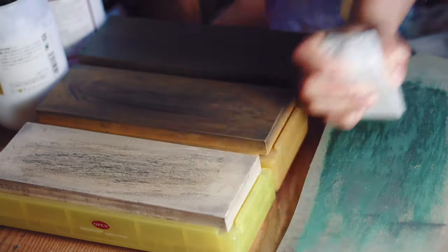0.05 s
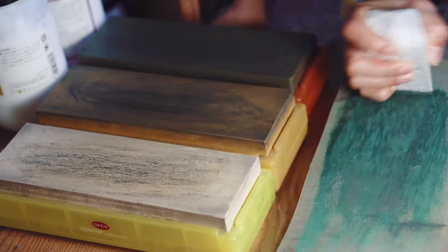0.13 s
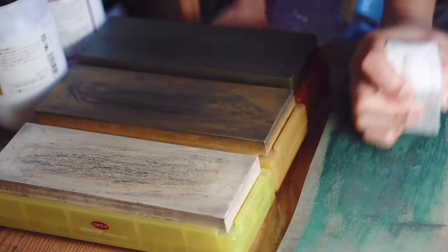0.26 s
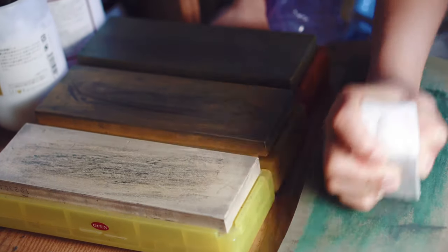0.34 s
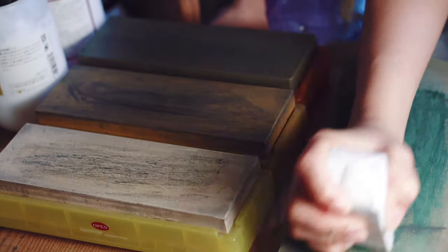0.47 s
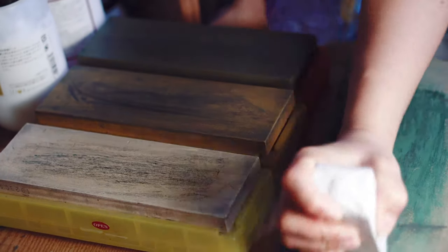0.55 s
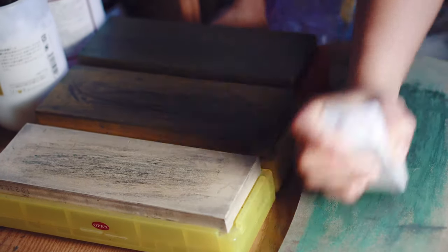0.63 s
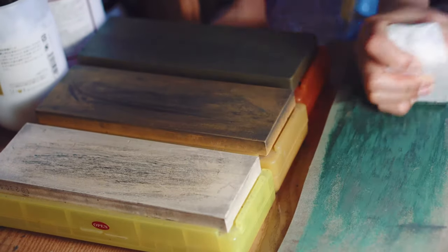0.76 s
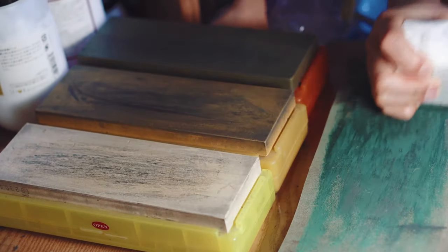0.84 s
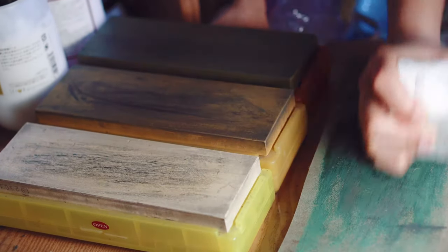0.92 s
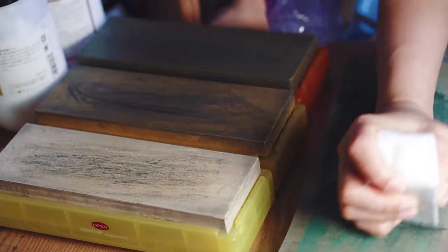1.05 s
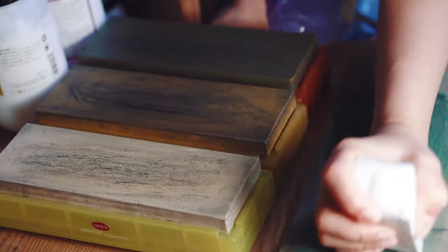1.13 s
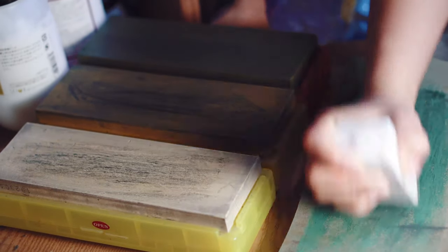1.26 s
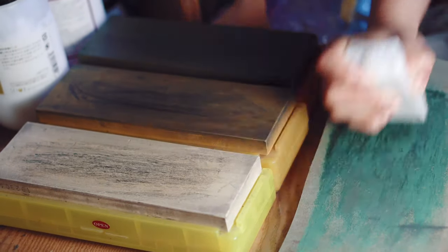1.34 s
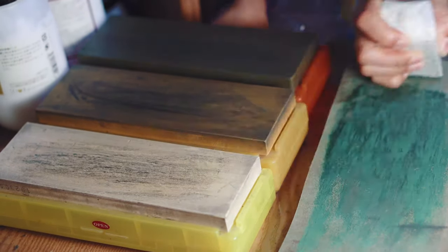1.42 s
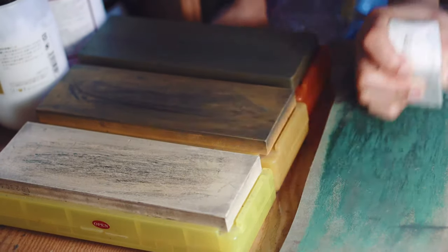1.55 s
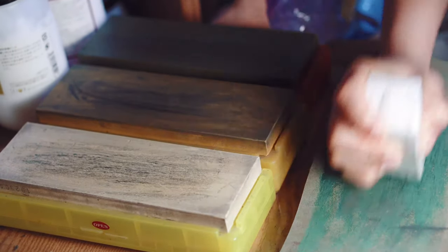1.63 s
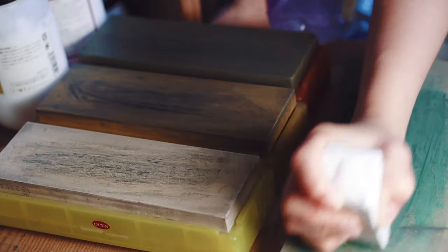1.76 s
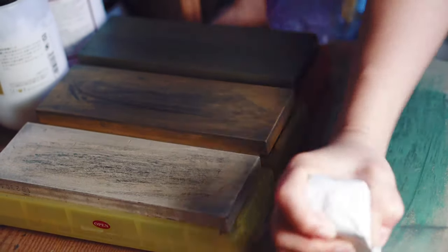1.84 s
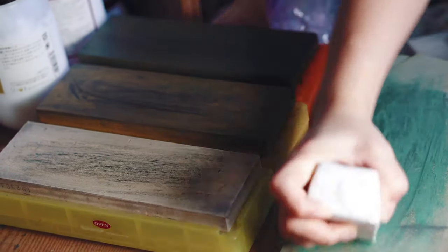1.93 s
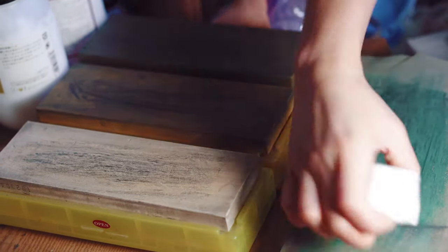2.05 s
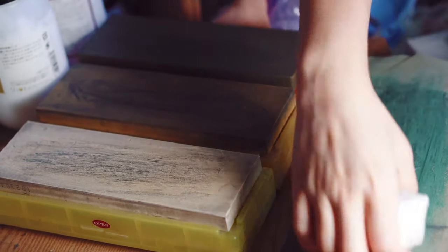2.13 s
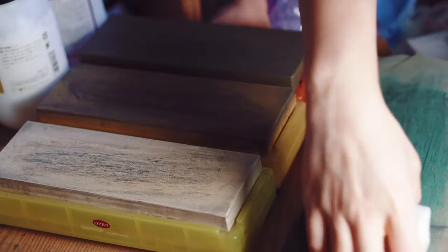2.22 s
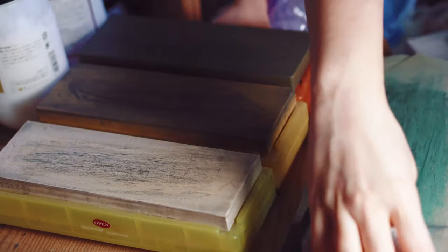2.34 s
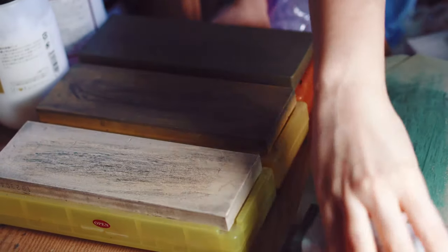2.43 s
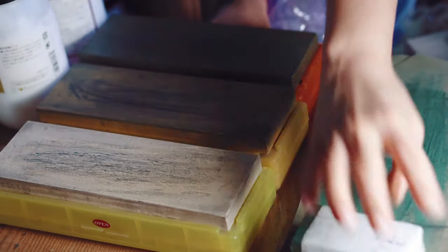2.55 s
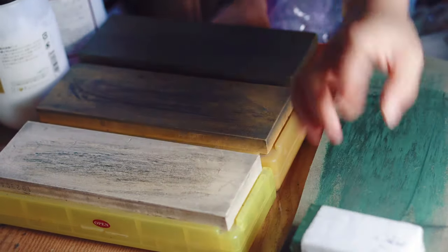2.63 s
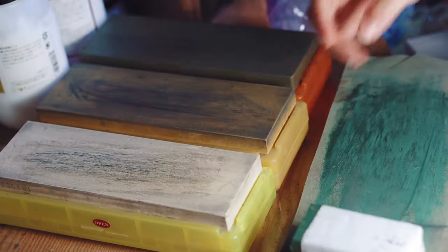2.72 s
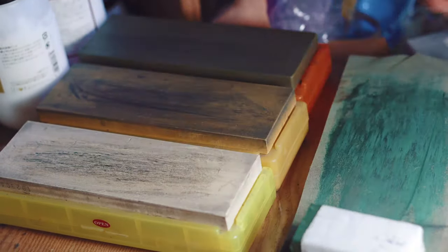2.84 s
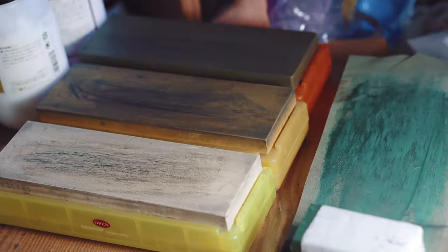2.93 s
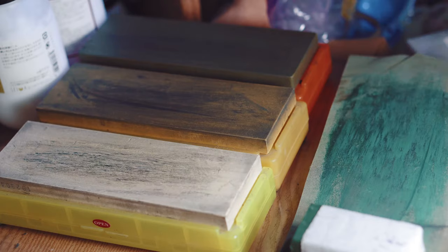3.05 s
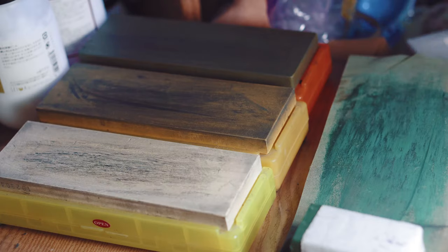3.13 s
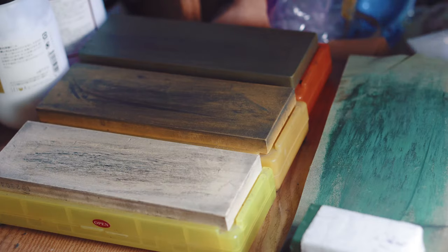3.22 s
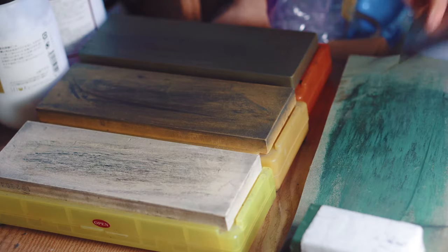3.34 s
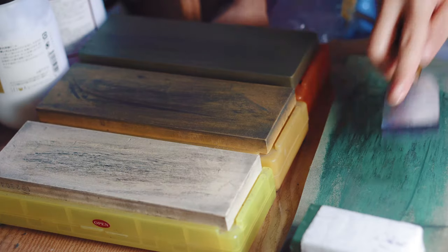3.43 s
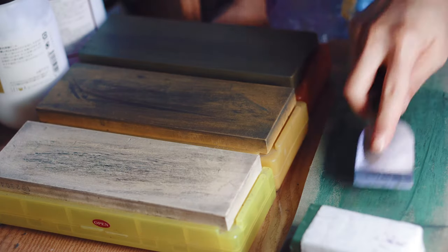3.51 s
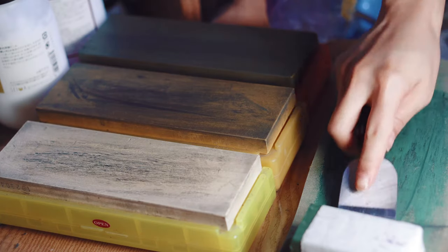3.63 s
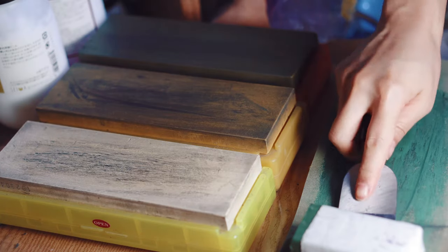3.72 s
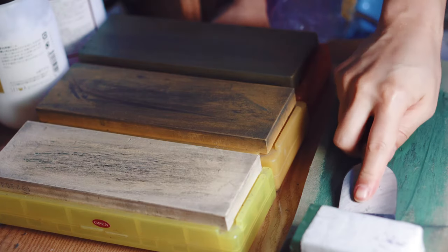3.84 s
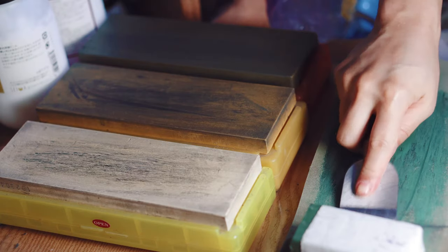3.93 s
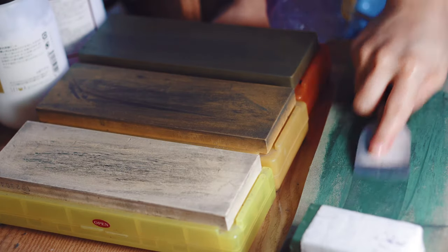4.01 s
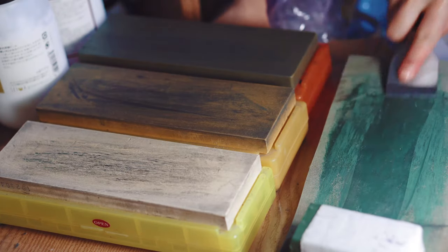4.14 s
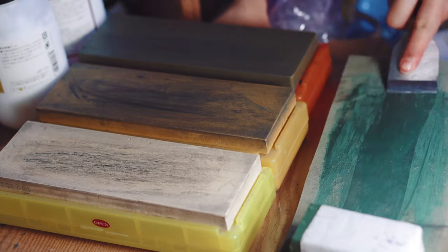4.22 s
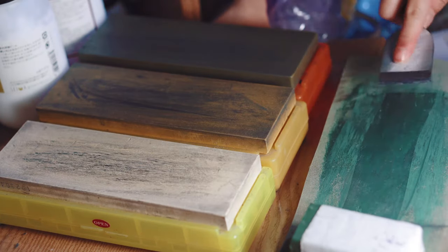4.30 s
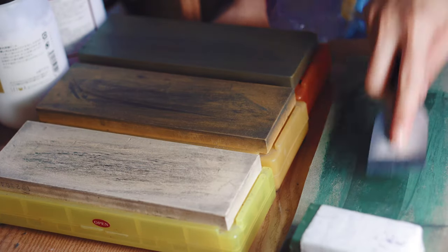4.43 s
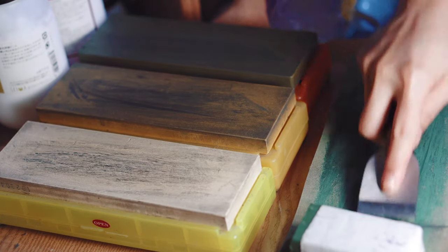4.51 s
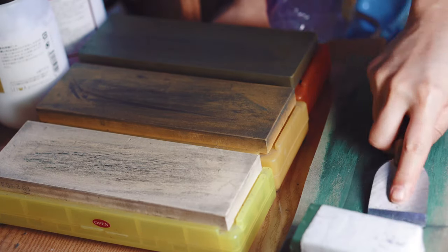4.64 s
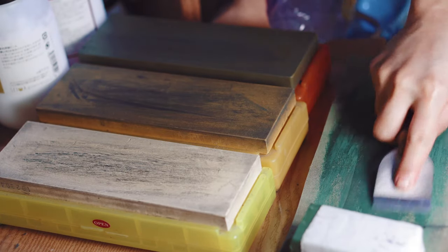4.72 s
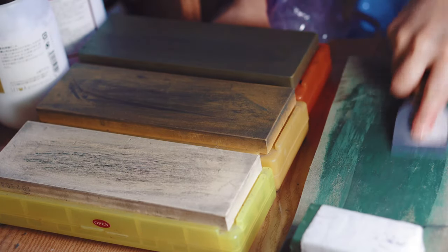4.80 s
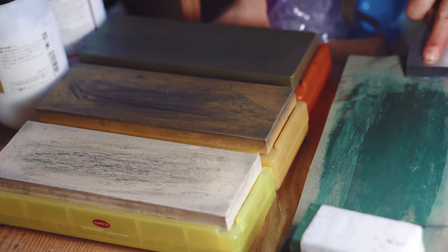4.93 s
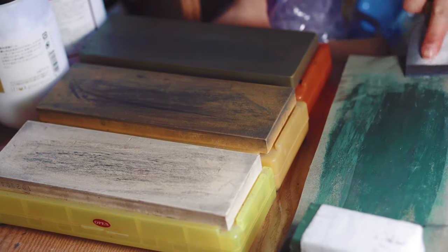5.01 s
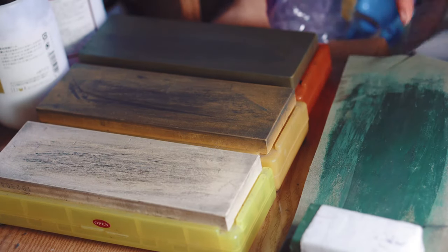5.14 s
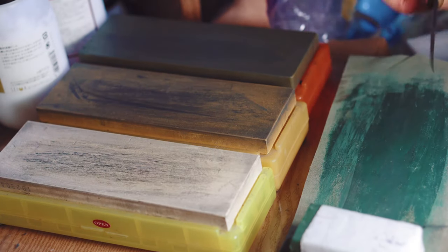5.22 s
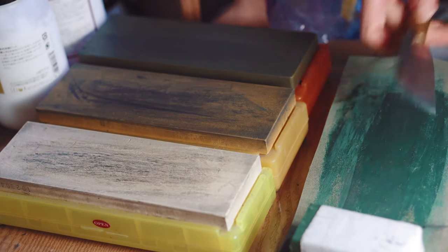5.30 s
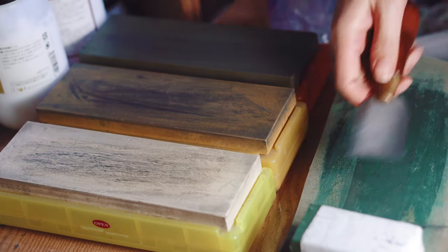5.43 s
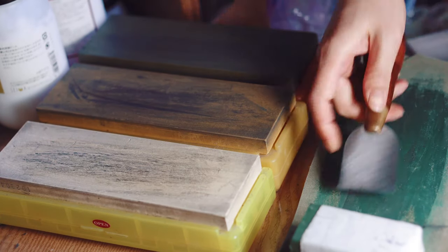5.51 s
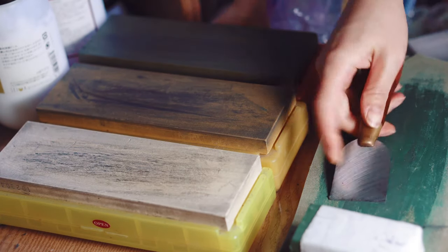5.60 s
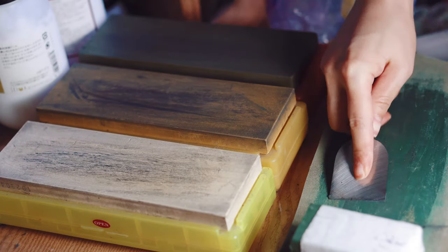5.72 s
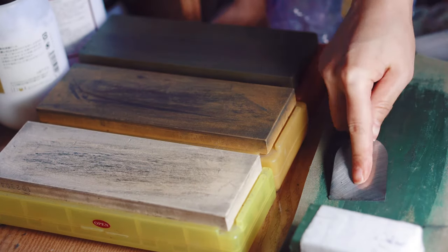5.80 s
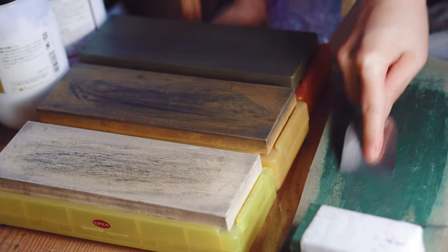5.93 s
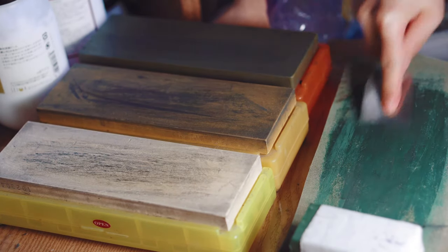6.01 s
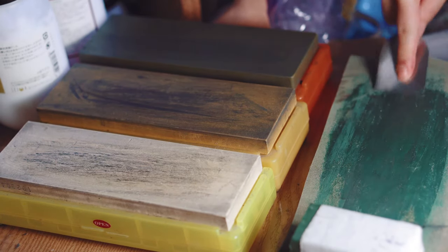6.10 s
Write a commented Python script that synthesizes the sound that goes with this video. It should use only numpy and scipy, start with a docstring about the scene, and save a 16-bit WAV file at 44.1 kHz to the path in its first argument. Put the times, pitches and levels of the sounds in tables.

```python
"""A block of polishing compound is scrubbed three times over a leather strop on a wooden table, then put down.
A flat steel blade is then drawn across the leather in three light swishes.
Friction is modelled as random slips exciting coloured spectra, and contacts as decaying bursts and modes.
The table rocks and thuds by damped modes and bending waves; a fan hums in the small room."""
import sys
import numpy as np
from scipy import signal
from scipy.fft import rfft, irfft
from scipy.io import wavfile
from scipy.ndimage import uniform_filter1d

SR = 44100
rng = np.random.default_rng(int(sys.argv[2]) if len(sys.argv) > 2 else 0)


def store_wav(level_fs):
    """Save 16-bit WAV to argv[1]."""
    pcm = np.round(np.clip(np.atleast_2d(level_fs), -1, 1) * 32767)
    wavfile.write(sys.argv[1], SR, pcm.T.astype(np.int16))


N = 271656
TIME, BINS = np.arange(N) / SR, np.fft.rfftfreq(N, 1 / SR)  # seconds, Hz

# fan: noise spectrum of the air [pitch_hz, level_db], relative
AIR_SPECTRUM = [(90, -11.5), (127, 0.5), (190, -13), (250, -12), (330, -16), (560, -20.5), (980, -21),
                (1350, -27.5), (2700, -38.5), (4650, -44), (9000, -46.5), (16000, -56.5)]
# resonant bumps in the air noise [pitch_hz, width_hz, lift_db]
AIR_MODES = [(511, 30, 6.5), (1703, 320, 4.5), (4460, 1220, 12)]
# motor tones [pitch_hz, level_db, waver_hz], waver as rms
MOTOR_TONES = [(65.5, -38, 2.26), (118.5, -46.5, 4.444), (551, -61.5, 3.03), (2640, -72.5, 0.094)]
AIR_DB = -42.5

# table top: nominal modes, level relative to the blow [pitch_hz, level_db, t60_s]
TABLE_MODES = [(47.45, -3, 1), (76.1, 1, 0.36), (104.6, -6.5, 0.48), (170, -14, 0.26), (397, -1, 0.036),
               (535, 1, 0.055)]
# low rumble of the shaken table [pitch_hz, level_db], relative
RUMBLE_SPECTRUM = [(15, 4), (33, -9), (50, -1.5), (62, -20), (82, -10.5), (120, -39), (250, -38.5),
                   (500, -53)]
# spells in which the arm leans on the table and shakes it [start_s, end_s, level_db]
LEANING_SPELLS = [(0, 2.58, -21.5), (4.1, 5.64, -36.5)]
# the table rocks on its legs where the arm turns back [middle_s, peak_db, pitch_hz]
TABLE_LURCHES = [(0.533, -6.5, 47), (1.012, -6, 41.3), (1.133, -4.5, 43.4), (1.836, -7.5, 47.4),
                 (1.885, -8.5, 48.6), (5.124, -16.5, 21.6)]
# block or blade lands on the leather; soft pushes are centred low, hard landings high
# [start_s, thud_db, thud_centre_hz, slap_db]
LANDINGS = [(0.236, -26, 120, -44), (0.283, -22, 72, -43), (0.494, -15.5, 61, -56),
            (.867, -14, 67.6, -28.5), (0.959, -15, 71.4, -36), (1.531, -17, 70, -30), (2.009, -26, 53, -49),
            (2.318, -13.5, 97, -34.5), (2.471, -20, 57.7, -35.5), (3.802, -24.5, 172, -41),
            (4.701, -20, 196, -33), (5.698, -19, 150, -32.5)]
SLAP_HZ, SLAP_T60_S = 890, 0.032
# the bending wave of a blow falls in pitch towards the table's main mode
BEND_END_HZ, BEND_SPAN_HZ, BEND_FALL_S, BEND_RISE_S, BEND_T60_S = 72.5, 427, 0.01063, 0.012, 0.23
SHAKE_RISE_DB_PER_S, SHAKE_FALL_DB_PER_S, SHAKE_REST_DB = 11, 59, -41.5
# extra sway as each scrub's fast push eases and after each stroke's top speed
SWAY_S, SCRUB_SWAY_DB, STROKE_SWAY_DB = 0.78, -22, -28.5
SWAY_LAG_S = 0.3  # a stroke's sway is centred this long after the blade's top speed

# fingers brushing block, blade and leather [middle_s, level_db, length_s]
FINGER_SCUFFS = [(.05, -59, 0.13), (.248, -48, 0.025), (.879, -46.5, 0.032), (1.546, -47, 0.028),
                 (2.02, -48.5, 0.13), (2.098, -47, 0.052), (2.272, -53, 0.052), (2.385, -52.5, 0.13),
                 (2.487, -45, 0.079), (3.15, -57, 0.052), (3.344, -54.5, 0.03), (4.456, -51.5, 0.02),
                 (5.078, -48.5, 0.045), (5.18, -52, 0.055)]
# rustle of skin [pitch_hz, level_db], relative
SKIN_SPECTRUM = [(500, 16.5), (1500, -5.5), (4200, -2), (5600, -6), (8700, -4.5), (12000, -13),
                 (16000, -19)]

# small contacts of block, nail and steel [start_s, starting_db, centre_hz, t60_s]
SMALL_CONTACTS = [(0.333, -31, 1240, 0.041), (0.477, -27.5, 2720, 0.05), (0.503, -34, 2600, 0.032),
                  (0.914, -34, 550, 0.068), (0.9593, -32.5, 1390, 0.13), (1.614, -33, 1630, 0.12),
                  (2.0084, -35, 5730, 0.024), (2.035, -42, 7000, .008), (2.08, -48, 6500, 0.021),
                  (2.164, -36.5, 11100, 0.016), (2.33, -41.5, 12000, 0.023), (2.457, -30.5, 8300, 0.027),
                  (2.461, -32.5, 2840, 0.032), (5.069, -39, 2000, 0.12), (5.084, -29, 1280, 0.045),
                  (5.274, -47.5, 4800, 0.043), (5.7, -50, 6440, 0.031)]
# body common to all small contacts [pitch_hz, level_db], relative
CONTACT_SPECTRUM = [(200, 27), (700, 24), (1700, 15), (2100, 12), (2700, 10), (4200, 8), (5600, 1.5),
                    (8700, 6.5), (12000, 6.5), (16000, -2)]
# the blade clinks as it is turned over and set down [start_s, level_db]
BLADE_CLINKS = [(5.243, -51), (5.274, -42.5), (5.697, -46.5)]
# ringing of the clinked blade, level relative to the hit [pitch_hz, level_db, t60_s]
CLINK_RINGING = [(3360, -4.5, 0.05), (4630, -3, 0.031), (6228, -11, 0.056), (7540, -2, 0.023),
                 (8500, -15, .03), (9100, -9, 0.055), (12500, -18, .03)]
# the block tips onto its side [start_s, level_db]
BLOCK_TAPS = [(2.408, -25)]
# ringing of the block, level relative to the hit [pitch_hz, level_db, t60_s]
BLOCK_RINGING = [(730, 1.5, 0.037), (880, -7, 0.03), (1160, -11.5, 0.032), (1583, -7.5, 0.025)]
# fingernails click on the block as the grip shifts and lets go [start_s, level_db]
NAIL_CLICKS = [(1.358, -49), (1.974, -43), (2.535, -38), (2.695, -37.5)]
# colour of a nail click [pitch_hz, level_db], relative
NAIL_SPECTRUM = [(1400, -2.5), (2100, -6), (2600, 5), (3400, -6), (4800, -20), (11000, -22.5)]
NAIL_T60_S = 0.022

# the blade gathers speed along the leather, then slows and lifts
# [edge_bites_s, top_speed_s, speeding_up_s, slowing_s, friction_db, edge_hiss_db]
BLADE_STROKES = [(4.01, 4.181, 0.094, 0.075, -30.5, -49.5), (4.78, 4.98, 0.083, 0.043, -25.5, -44.5),
                 (5.975, 6.02, 0.061, 0.14, -40.5, -50.5)]
# friction of the flat steel face [pitch_hz, level_db], relative
FACE_SPECTRUM = [(110, 15.5), (200, -0.5), (330, -3.5), (560, -1.5), (950, -8), (1500, -5.5), (2100, -9.5),
                 (2900, -8.5), (4300, -9), (5300, -27), (8000, -50)]
# resonances stirred in the blade [pitch_hz, width_hz, lift_db]
FACE_MODES = [(460, 336, 14.5), (1290, 170, 8), (1650, 310, 5.5)]
# hiss of the blade's edge [pitch_hz, level_db], relative
EDGE_SPECTRUM = [(5000, 2.5), (6100, 5.5), (8900, 8), (11000, 1), (13500, -4), (16000, -6)]
# at top speed in the hardest stroke the edge rasps on one resonance [middle_s, level_db, length_s]
EDGE_RASPS = [(4.992, -36.5, 0.043)]
# resonance of that rasp [pitch_hz, level_db], relative
RASP_SPECTRUM = [(3700, -9), (4060, 2), (4450, -8)]
# the blade creeps into place before its last stroke [middle_s, level_db, length_s]
BLADE_CREEPS = [(5.84, -35, 0.025), (5.894, -33, .02), (5.87, -37, 0.19)]
# low judder of the creeping blade [pitch_hz, level_db], relative
CREEP_SPECTRUM = [(90, -1.5), (190, -3.5), (300, -17), (480, -4.5), (800, -33)]
# fingertips slide on the steel and make it ring faintly [middle_s, level_db, length_s]
STEEL_WISPS = [(5.3, -66, .1), (5.41, -65, 0.07), (5.595, -67, 0.054), (5.79, -67.5, 0.24),
               (5.93, -63, 0.079)]
# colour of the fingertip slides [pitch_hz, level_db], relative
WISP_SPECTRUM = [(5500, -1), (8800, 0), (10500, -15), (14000, -11)]
# faint ringing of the touched steel [pitch_hz, width_hz, lift_db]
WISP_RINGING = [(8750, 300, 4), (9300, 260, 8), (12250, 300, 12)]
FACE_POWER, EDGE_POWER = 0.74, 0.49  # friction and hiss grow as these powers of the speed
BITE_S, LIFT_POWER = 0.018, 2.7  # time for the bevel to settle flat; steepness of the slowing
BODY_HZ, BODY_LIMIT_DB = 870, -33.5  # the low body levels off in a hard stroke, so it sounds brighter

# the block is pushed along the leather, fast at first and then easing
# [start_s, length_s, fast_part_s, friction_db, grit_hiss_db]
BLOCK_SCRUBS = [(0.282, 0.34, 0.22, -42.5, -48), (0.92, 0.33, 0.19, -44.2, -48),
                (1.569, 0.36, 0.29, -43.5, -48)]
# drag of wax on leather [pitch_hz, level_db], relative
WAX_SPECTRUM = [(400, 14.5), (900, 0), (2130, -1), (2700, 1), (4300, 2), (5800, -6.5), (7000, -6),
                (9100, -19)]
# resonances of the drag [pitch_hz, width_hz, lift_db]
WAX_RESONANCES = [(1260, 140, 7.5), (1690, 150, 8.5)]
# hiss of the grit [pitch_hz, level_db], relative
GRIT_SPECTRUM = [(5500, -20), (7200, -2), (9000, 0.5), (10300, -3.5), (11600, -3.5), (16000, -14)]
# wax crumbs crushed as the block is drawn back or set aside [middle_s, level_db, length_s]
WAX_CRUMBS = [(.13, -50.5, 0.24), (.76, -52.5, 0.15), (1.39, -52, 0.17), (2.01, -54, 0.14)]
# crunch of the crumbs [pitch_hz, level_db], relative
CRUNCH_SPECTRUM = [(700, 3), (1700, 11), (2700, 6), (4500, 0), (8000, -14)]
SCRUB_RISE_S, SCRUB_STOP_DB_PER_S = 0.046, 210
EASE_S, EASE_DRAG_DB, EASE_GRIT_DB = 0.018, -1.5, -7.5  # as the push slows, hiss drops more than drag
# the block's leading edge scrapes on one resonance, which rises and falls with the speed of the push
SCRAPE_HZ, SCRAPE_SWING_HZ, SCRAPE_WIDTH_HZ = 3580, 870, 1300
SCRAPE_DB, SCRAPE_FADE_DB_PER_S = -50.5, 31

CUT_HZ = 15900


def amp(db):
    """Level law: twenty decibels are a factor of ten in amplitude."""
    return 10 ** (np.asarray(db) / 20)


def unit(x):
    """Normalisation by mean power: scales to rms 1."""
    return x / np.sqrt(np.mean(x ** 2) + 1e-20)


def shape_db(points, hz):
    """Spectral envelope on a log-frequency axis, with skirts of 30 dB per octave beyond its ends."""
    point_hz, db = np.transpose(points)
    octave, known = np.log2(hz + 1), np.log2(point_hz + 1)
    beyond = abs(octave - np.clip(octave, known[0], known[-1]))
    return np.interp(octave, known, db) - 30 * beyond


def colour(x, points, modes=()):
    """Linear filtering: multiplies the spectrum of x by an envelope with resonant bumps; rms 1."""
    db = shape_db(points, BINS)
    for hz, width_hz, lift_db in modes:
        db = db + lift_db / (1 + (2 * (BINS - hz) / width_hz) ** 2)
    return unit(irfft(rfft(x) * amp(db), N))


def wander(rate_hz):
    """Slow random fluctuation: noise low-passed near rate_hz, rms 1."""
    noise = rng.standard_normal(N)
    return unit(irfft(rfft(noise) / (1 + (BINS / rate_hz) ** 4), N))


def slips(per_s):
    """Stick-slip excitation: sparse random impulses of uneven size, rms 1."""
    sizes = rng.standard_normal(N)
    return unit(sizes * (rng.random(N) < per_s / SR))


def uneven(x, patch_db):
    """Surface inhomogeneity: the colour of the rubbing shifts in small time-frequency patches."""
    z = signal.stft(x, nperseg=512, noverlap=384)[2]
    patches = uniform_filter1d(rng.standard_normal(z.shape), size=3, axis=0)
    patches = uniform_filter1d(patches, size=12, axis=1)
    varied = z * amp(patch_db * unit(patches))
    return unit(signal.istft(varied, nperseg=512, noverlap=384)[1][:N])


def resonate(x, hz, width_hz):
    """Moving resonance: a double pole in a frame turning at hz; rms 1."""
    turn = np.exp(2j * np.pi * np.cumsum(hz) / SR)
    radius = np.exp(-np.pi * width_hz / SR)
    filtered = signal.lfilter([1], np.poly([radius, radius]), x / turn)
    return unit((turn * filtered).real)


def brushes(rows):
    """Contact envelope: the gain of soft-edged touches [middle_s, level_db, length_s]."""
    return sum(amp(db) * np.exp(-(2 * (TIME - s) / length) ** 4) for s, db, length in rows)


def add(mix, s, sound):
    """Superposition: adds a sound to the mix from s seconds on."""
    part = mix[max(round(s * SR), 0):][:len(sound)]
    part += sound[:len(part)]


def fan():
    """Broadband flow noise with frequency-modulated motor tones."""
    out = amp(AIR_DB) * colour(rng.standard_normal(N), AIR_SPECTRUM, AIR_MODES)
    for hz, db, waver_hz in MOTOR_TONES:
        tone_hz = hz + waver_hz * wander(rate_hz=7.1)
        out = out + amp(db) * unit(np.sin(2 * np.pi * np.cumsum(tone_hz) / SR))
    return out


def room(x, wet_db=-15, t60_s=0.28):
    """Reverberation: sparse reflections from the near walls decay exponentially as a short, faint tail."""
    t = np.arange(SR // 3) / SR
    reflections = rng.standard_normal(len(t)) * (rng.random(len(t)) < .06)
    tail = reflections * (t > .004) * amp(-60 * t / t60_s)
    return x + amp(wet_db) * signal.fftconvolve(x, tail / np.linalg.norm(tail))[:N]


def shaking():
    """Power summation: leaning shakes the table, with sway as scrubs ease and after strokes' top speed."""
    leaning = 0
    for start, end, db in LEANING_SPELLS:
        rise_db = SHAKE_RISE_DB_PER_S * np.maximum(start - TIME, 0)
        fall_db = SHAKE_FALL_DB_PER_S * np.maximum(TIME - end, 0)
        leaning = leaning + amp(db - rise_db - fall_db)
    scrubs = brushes([(s + fast_s, SCRUB_SWAY_DB, SWAY_S) for s, _, fast_s, *_ in BLOCK_SCRUBS])
    strokes = brushes([(top_s + SWAY_LAG_S, STROKE_SWAY_DB, SWAY_S) for _, top_s, *_ in BLADE_STROKES])
    return np.sqrt(amp(SHAKE_REST_DB) ** 2 + leaning ** 2 + scrubs ** 2 + strokes ** 2)


def knock(db, centre_hz, swell_cycles=1.0, octaves=1.89):
    """Dispersion: a bending wave crosses the table top, high notes first; the modes swell behind it."""
    t = np.arange(SR // 3) / SR

    def drive(hz):
        """Spectrum of the blow: strongest at centre_hz."""
        return amp(db) / (1 + (np.log2(hz / centre_hz) / octaves) ** 4) ** 2

    wave_hz = BEND_END_HZ + BEND_SPAN_HZ / (1 + t / BEND_FALL_S) ** 2
    wave = (1 - np.exp(-t / BEND_RISE_S)) * amp(-60 * t / BEND_T60_S)
    out = drive(wave_hz) * wave / wave.max() * np.sin(2 * np.pi * np.cumsum(wave_hz) / SR)
    for hz, mode_db, t60 in TABLE_MODES:
        swell = (1 - np.exp(-(t * hz / swell_cycles) ** 3)) * amp(-60 * t / t60)
        mode_hz = hz * rng.uniform(0.98, 1.065)  # each blow detunes the mode slightly
        out = out + drive(hz) * amp(mode_db) * swell / swell.max() * np.sin(2 * np.pi * mode_hz * t)
    return out


def table():
    """Forced vibration under the arm, with a few cycles of rocking at the turns and a thud at each blow."""
    out = colour(rng.standard_normal(N), RUMBLE_SPECTRUM) * shaking()
    for s, db, hz in TABLE_LURCHES:  # each one swells and dies within about three cycles
        cycles = (TIME - s) * hz
        out += amp(db) * np.exp(-(cycles / 1.58) ** 2) * np.cos(2 * np.pi * cycles)
    for s, db, centre_hz, _ in LANDINGS:
        add(out, s, knock(db, centre_hz))
    return out


def fingers():
    """Sliding friction of skin: clumpy random slips rustle in short brushes."""
    rustle = colour(slips(per_s=6000), SKIN_SPECTRUM)
    return brushes(FINGER_SCUFFS) * unit(rustle * amp(1.9 * wander(rate_hz=30)))


def ticks(octaves=2.1, slope_db=17, crack_s=0.000076, crack_db=3):
    """Impact excitation: a quick crack and a short crumble, dull or bright by its own centre pitch."""
    out, t = np.zeros(N), np.arange(SR // 5) / SR
    hz = abs(np.fft.fftfreq(len(t), 1 / SR))
    slaps = [(s, slap_db, SLAP_HZ, SLAP_T60_S) for s, _, _, slap_db in LANDINGS]
    for s, db, centre_hz, t60 in SMALL_CONTACTS + slaps:
        envelope = amp(-60 * t / t60) + amp(crack_db) * np.exp(-t / crack_s)
        burst = rng.choice([-1, 1], len(t)) * envelope
        # rounded top, straight slopes
        skirt_db = -slope_db * np.hypot(np.log2((hz + 1) / centre_hz), octaves)
        gain = unit(amp(shape_db(CONTACT_SPECTRUM, hz) + skirt_db))
        # minimum phase: rings only after the contact
        causal = np.exp(np.conj(signal.hilbert(np.log(gain + 1e-4))))
        add(out, s, amp(db) * np.fft.ifft(np.fft.fft(burst) * causal).real)
    return out


def ring(hits, modes, vary_db=5.0):
    """Damped modes: a small object held by fingers rings briefly; each hit favours other modes."""
    out, t = np.zeros(N), np.arange(SR // 5) / SR
    for s, db in hits:
        for hz, mode_db, t60 in modes:
            hit_db = db + mode_db + vary_db * rng.standard_normal()
            add(out, s, amp(hit_db - 60 * t / t60) * np.sin(2 * np.pi * hz * t))
    return out


def nails():
    """Heavily damped impact: each nail click is a dry snap that dies within a few milliseconds."""
    gain = sum((TIME > s) * amp(db - 60 * abs(TIME - s) / NAIL_T60_S) for s, db in NAIL_CLICKS)
    return colour(rng.standard_normal(N), NAIL_SPECTRUM) * gain


def blade():
    """Speed-dependent friction: slipping leather fibres stir the steel's resonances while the edge hisses."""
    face_gain = edge_gain = 0
    for bite, top_s, rise_s, fall_s, face_db, edge_db in BLADE_STROKES:
        age = TIME - top_s
        speed = np.exp(-np.where(age < 0, (age / rise_s) ** 2, abs(age / fall_s) ** LIFT_POWER))
        contact = .5 + .5 * np.tanh(2 * (TIME - bite) / BITE_S)
        face_gain = face_gain + amp(face_db) * contact * speed ** FACE_POWER
        edge_gain = edge_gain + amp(edge_db) * contact * speed ** EDGE_POWER
    face = uneven(colour(slips(per_s=4500), FACE_SPECTRUM, FACE_MODES), patch_db=1.4)
    body = signal.sosfiltfilt(signal.butter(2, BODY_HZ, fs=SR, output="sos"), face)
    limited_body = body / np.hypot(1, face_gain / amp(BODY_LIMIT_DB))
    face = face_gain * (face - body + limited_body)
    edge = uneven(colour(slips(per_s=20000), EDGE_SPECTRUM), patch_db=1.4) * edge_gain
    rasp = colour(slips(per_s=11000), RASP_SPECTRUM) * brushes(EDGE_RASPS)
    creep = colour(slips(per_s=2700), CREEP_SPECTRUM) * brushes(BLADE_CREEPS)
    wisps = colour(slips(per_s=16000), WISP_SPECTRUM, WISP_RINGING)
    wisps = wisps * unit(amp(4.2 * wander(rate_hz=70))) * brushes(STEEL_WISPS)
    grip = amp(1.1 * wander(rate_hz=110))
    return grip * (face + edge + rasp) + creep + wisps


def compound():
    """Dry friction: wax drags on the nap, its grit hisses most on the fast push, and loose crumbs crunch."""
    drag_gain = grit_gain = scrape_gain = speed = 0
    for s, length, fast_s, drag_db, grit_db in BLOCK_SCRUBS:
        age = TIME - s
        stop = amp(-SCRUB_STOP_DB_PER_S * np.maximum(age - length, 0))
        contact = np.clip(age / SCRUB_RISE_S, 0, 1) * stop
        eased = .5 + .5 * np.tanh((age - fast_s) / (2 * EASE_S))
        drag_gain = drag_gain + contact * amp(drag_db + EASE_DRAG_DB * eased)
        grit_gain = grit_gain + contact * amp(grit_db + EASE_GRIT_DB * eased)
        scrape_gain = scrape_gain + contact * amp(SCRAPE_DB - SCRAPE_FADE_DB_PER_S * abs(age))
        speed = speed + np.sin(np.pi * np.clip(age / length, 0, 1)) ** 2
    scrape_hz = SCRAPE_HZ + SCRAPE_SWING_HZ * speed
    scrape = resonate(slips(per_s=3700), scrape_hz, SCRAPE_WIDTH_HZ) * scrape_gain
    drag = uneven(colour(slips(per_s=7500), WAX_SPECTRUM, WAX_RESONANCES), patch_db=2) * drag_gain
    grit = uneven(colour(slips(per_s=7000), GRIT_SPECTRUM), patch_db=1.8) * grit_gain
    crunch = colour(slips(per_s=2300), CRUNCH_SPECTRUM)
    crumbs = unit(crunch * amp(4.6 * wander(rate_hz=40))) * brushes(WAX_CRUMBS)
    grip = amp(0.7 * wander(rate_hz=35))
    return grip * (drag + scrape) + grit + crumbs


def scene():
    """Superposition of the reverberant work on the strop, the table and the fan."""
    contacts = ticks() + ring(BLADE_CLINKS, CLINK_RINGING) + ring(BLOCK_TAPS, BLOCK_RINGING) + nails()
    work = compound() + blade() + fingers() + contacts
    return (room(work) + table() + fan())[None]


def record(dry):
    """Band limitation: a linear-phase low-pass filter removes the highest treble."""
    low_pass = signal.firwin(511, CUT_HZ, window=("kaiser", 9), fs=SR)
    return signal.oaconvolve(dry, low_pass[None], "same")


dry = scene()
out = record(dry)
store_wav(out)
```